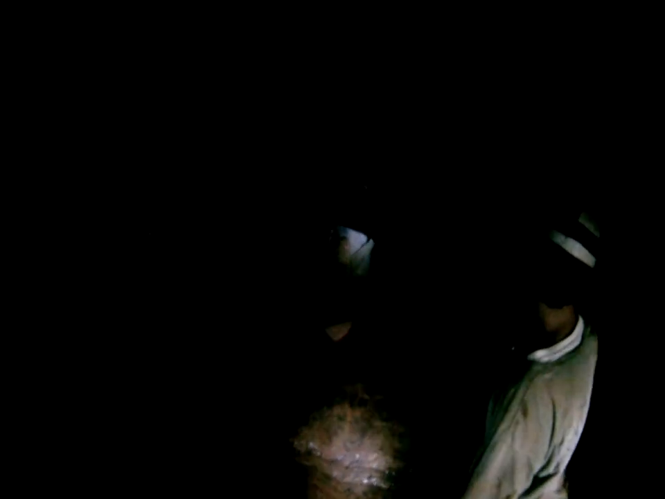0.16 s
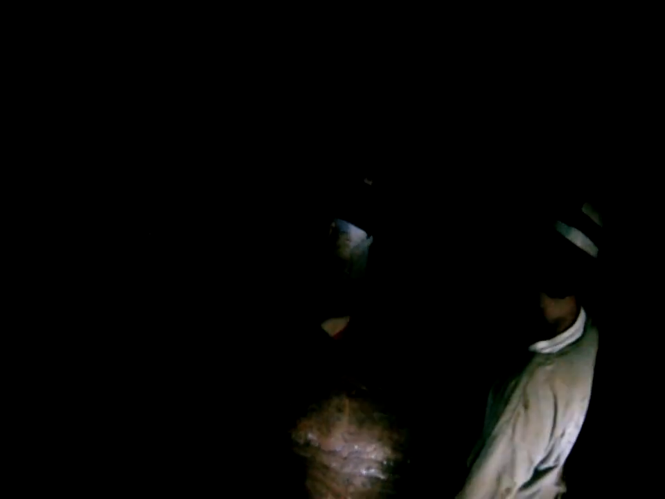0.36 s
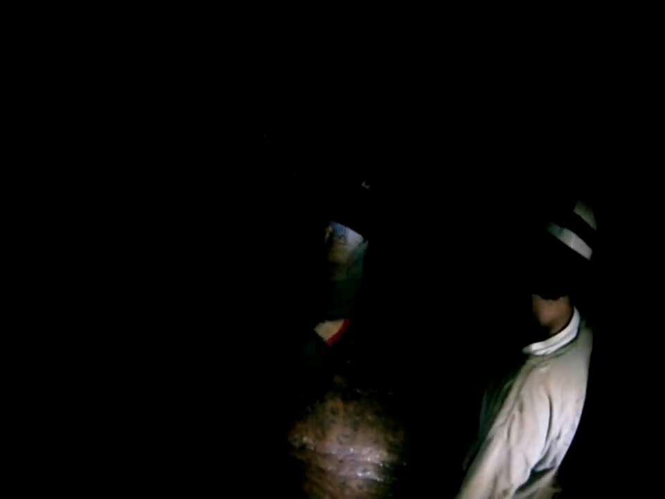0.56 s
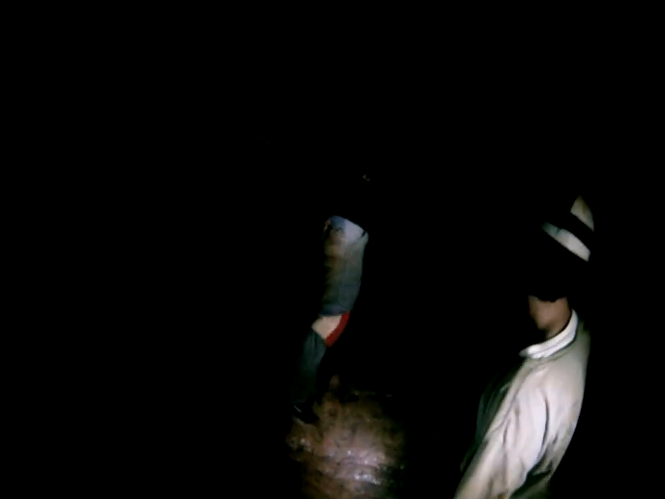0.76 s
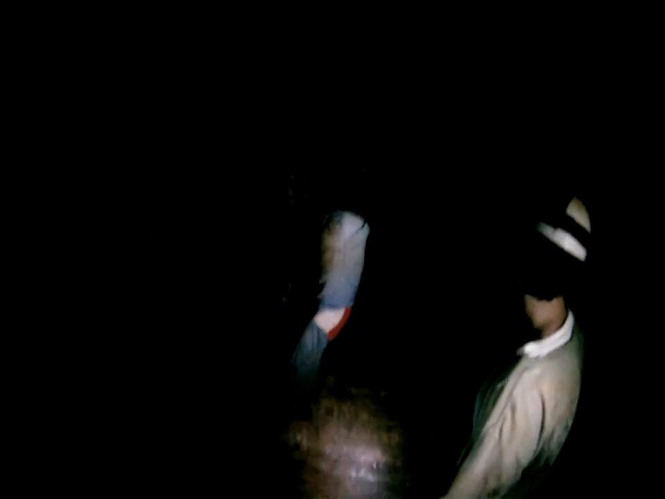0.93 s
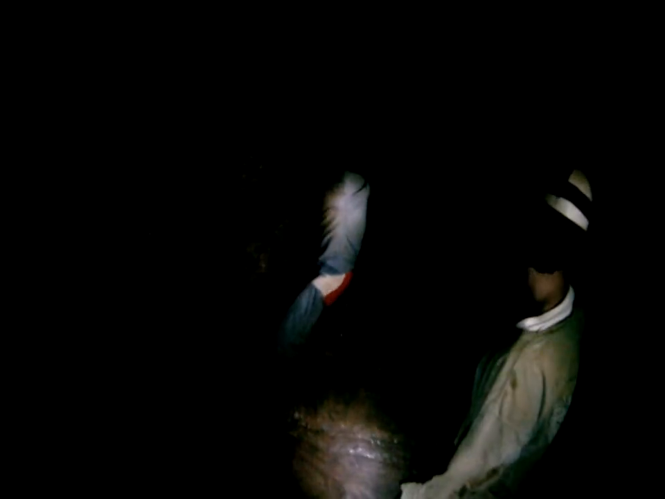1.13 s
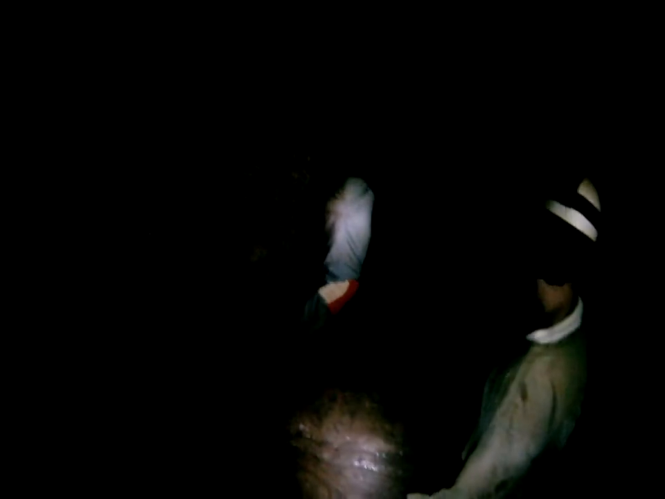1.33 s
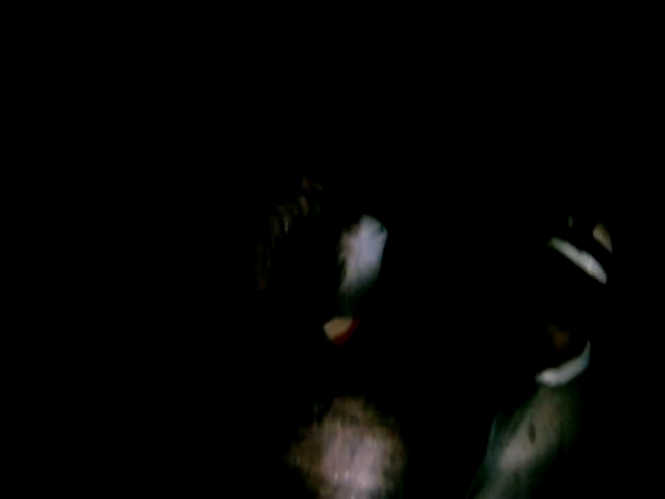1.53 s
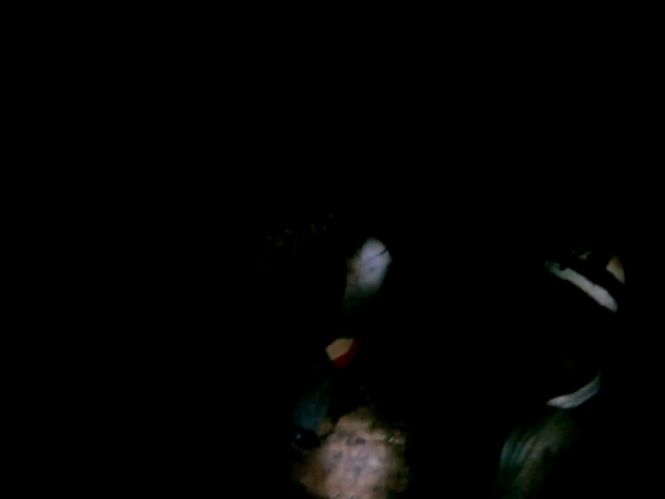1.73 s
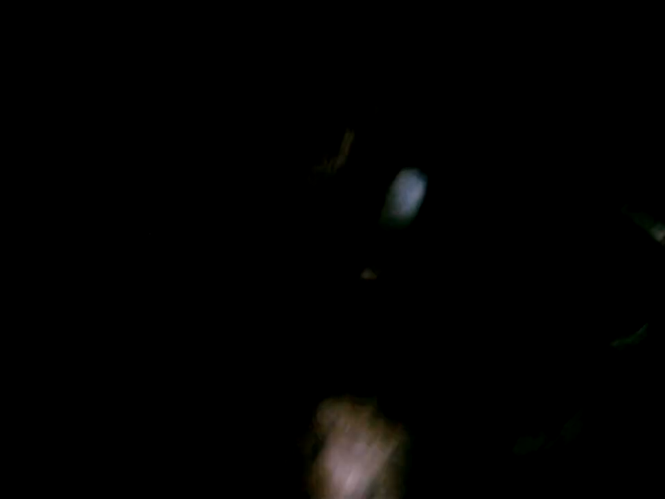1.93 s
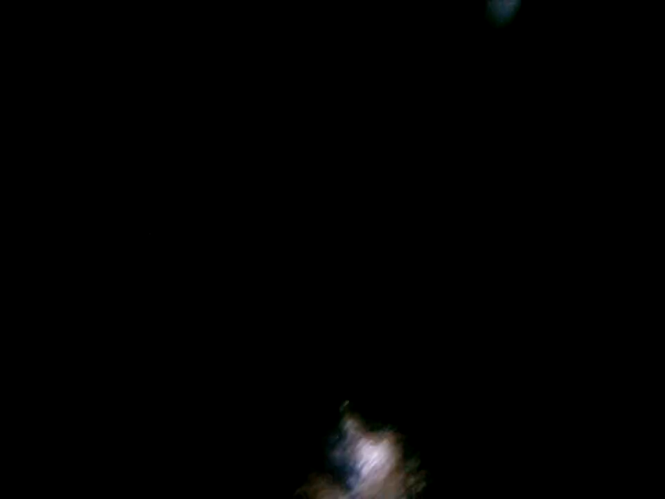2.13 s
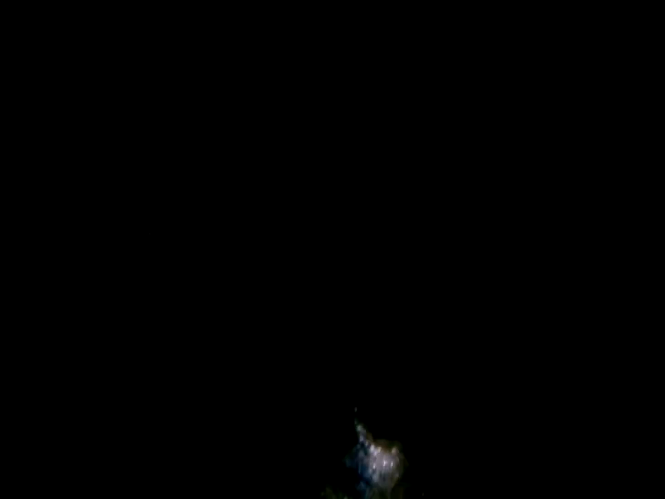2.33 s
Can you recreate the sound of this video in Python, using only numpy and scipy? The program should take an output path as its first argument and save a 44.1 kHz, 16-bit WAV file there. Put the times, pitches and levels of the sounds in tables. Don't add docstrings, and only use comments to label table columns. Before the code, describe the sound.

Steady water hiss fills a cave passage, coloured by a ringing sealed housing; a hard low double knock comes early with a brief rattle, then weaker thumps, a few tiny drops and faint late bumps.

```python
import sys
import numpy as np
from scipy import signal
from scipy.fft import rfft, irfft, next_fast_len
from scipy.io import wavfile
from scipy.ndimage import uniform_filter1d, map_coordinates

SR = 44100
rng = np.random.default_rng(int(sys.argv[2]) if len(sys.argv) > 2 else 0)


def unload_audio(sound):
    columns = np.transpose(np.atleast_2d(sound))
    steps = np.round(np.clip(columns, -1, 1) * 32767)
    wavfile.write(sys.argv[1], SR, steps.astype(np.int16))


def linear_from_db(decibels):
    return 10 ** (np.asarray(decibels, float) / 20)


N = 105840

# f/Hz, level/dB per Hz
WATER_COLOUR = [(100, -11.5), (300, -13), (700, -13.5), (1600, -15), (3000, -15.5), (4500, -24.5),
                (5500, -16), (6000, -25)]
# f/Hz, width/Hz, level/dB
SHELL_RESONANCES = [(1164, 137, -2), (1415, 61, -10), (1850, 124, -9), (2100, 233, 0.5), (2470, 205, -5),
                    (2684, 80, -1.5), (2890, 150, -5), (3174, 130, -7.5), (3603, 343, -4.5), (3794, 75, -7),
                    (4450, 200, -16), (4987, 288, -6)]
# t/s, peak level/dB
DROPS = [
    (1.1818, -27),
    (1.2972, -29),
    (2.273, -29),
    (2.0513, -33),
    (1.692, -33),
    (1.0748, -33),
    (.9485, -33),
]
# t/s, peak level/dB, f/Hz, rise/s, softness
BUMPS = [(0.2102, -11.5, 82.5, 0.014, 2.8), (0.2413, -21, 73.2, 0.013, 4.9),
         (0.2636, -27.2, 81.6, 0.022, 5.2), (0.2923, -35, 62, 0.0079, 0.69), (0.377, -23, 55.6, 0.024, 10),
         (0.4211, -21, 53, 0.0088, 0.47), (0.62, -41, 27.7, 0.0083, 0.87),
         (0.7902, -41.5, 35.8, 0.019, 5.9), (0.9254, -37.5, 51.5, 0.027, 1.1),
         (1.1758, -44, 55, 0.025, 0.92), (1.346, -52, 55.7, 0.021, 0.81),
         (1.4974, -46.9, 55.6, 0.0182, 0.53), (1.5969, -34, 60, 0.0093, 2.4),
         (2.0342, -41, 43.8, 0.027, 8.6), (2.0812, -30, 33.5, 0.026, 5.7),
         (2.1341, -36.9, 49.3, 0.042, 2.5), (2.23, -38, 51.1, 0.016, 1.6),
         (2.2945, -39.5, 34.3, 0.0151, 1.6), (2.36, -36, 37.6, 0.0122, 4.4)]
# t/s, peak level/dB, f/Hz, rise/s,
# softness
RINGS = [(.213, -30.5, 161.6, 0.016, 2), (.24, -37, 163, .012, 2.5), (.218, -42.5, 287, 0.019, 1.3),
         (.212, -41.5, 223, 0.0086, 2.8), (.39, -48, 240, .012, 1.9), (.228, -42.5, 1147, .014, 0.62),
         (.25, -58, 1160, 0.006, 2.9), (.386, -43, 1087, 0.0042, 1.5), (.39, -41, 149, 0.018, 2.5),
         (.415, -41.5, 166.6, 0.017, 1.4), (.505, -42, 57.2, 0.026, 1.2), (.57, -42.5, 58, .02, 1.8),
         (.635, -48, 101, 0.017, 1.9), (1.79, -44.5, 55.3, .015, 1.5), (2.003, -44, 55, 0.018, 2.6),
         (2.03, -55.5, 127, 0.027, 0.89)]
# t/s, level/dB, swell/s
RATTLES = [
    (.212, -42.5, 0.013),
    (.242, -43, 0.011),
    (0.385, -46, 0.0062),
    (.425, -56, 0.013),
]
# f/Hz, width/Hz, level/dB
LOOSE_PARTS = [(240, 120, -2.5), (1030, 55, 1), (1470, 68, -11), (2600, 900, -7.5)]
# f/Hz, level/dB per Hz
RUMBLE_COLOUR = [(10, -6), (25, -11.5), (40, -3), (56, -1.5), (75, -10.5), (110, -22), (200, -38),
                 (400, -59)]

WATER_DB, PATCHY_DB, SURGE_DB, FLUTTER_DB = -40, 0.46, 0.43, 0.21
SPRAY_PER_S, SPRAY_DB, SPRAY_SPREAD_DB = 400, -17, 2
DROP_HZ, DROP_WIDTH_HZ = 2500, 1050
RUMBLE_DB, LUMPS_DB = -54.5, 0.5
RECORDER_HZ, HOLD = 12000, 4


def unit(x):
    return x / np.sqrt(np.mean(x ** 2) + 1e-20)


def along(points, hz):
    f, db = np.transpose(points)
    return linear_from_db(np.interp(np.log(hz + 1), np.log(f + 1), db))


def humps(peaks, hz):
    return sum(linear_from_db(2 * db) / (1 + (2 * (hz - centre) / width) ** 2) for centre, width, db in peaks)


def wobble(rate):
    knots = rng.standard_normal(int(N * rate / SR) + 4)
    return map_coordinates(knots, [np.arange(N) * rate / SR])


def coloured(x, gain):
    m = 2 * next_fast_len(N // 2 + SR // 4)
    cepstrum = irfft(np.log(gain(np.fft.rfftfreq(m, 1 / SR)) + 1e-6), m)
    cepstrum[1:m // 2] *= 2
    cepstrum[m // 2 + 1:] = 0
    return irfft(rfft(x, m) * np.exp(rfft(cepstrum)), m)[:N]


def swell(u, softness):
    return (u * np.exp(1 - u)) ** softness


def water():
    flow = unit(coloured(rush() + linear_from_db(SPRAY_DB) * spray(), shell))
    level_db = WATER_DB + SURGE_DB * wobble(1.68) + FLUTTER_DB * wobble(25.2)
    return flow * linear_from_db(level_db) + drops()


def rush():
    z = signal.stft(rng.standard_normal(N), nperseg=512)[2]
    patches = uniform_filter1d(rng.standard_normal(z.shape), size=6, axis=0)
    patches = uniform_filter1d(patches, size=10, axis=1)
    return unit(signal.istft(z * linear_from_db(PATCHY_DB * unit(patches)), nperseg=512)[1][:N])


def spray():
    when, how_big, sign = rng.random((int(SPRAY_PER_S * N / SR), 3)).T
    size = linear_from_db(-SPRAY_SPREAD_DB * np.log(1 - how_big)) * np.sign(sign - .5)
    return unit(np.bincount((when * N).astype(int), size, N))


def drops():
    one_peak = np.abs(coloured(np.arange(N) == 0, pop)).max()
    starts = [round(t * SR) for t, _ in DROPS]
    sizes = [-linear_from_db(db) / one_peak for _, db in DROPS]
    return coloured(np.bincount(starts, sizes, N), pop)


def pop(hz):
    return shell(hz) * humps([(DROP_HZ, DROP_WIDTH_HZ, 0)], hz)


def shell(hz):
    power = along(WATER_COLOUR, hz) ** 2 + humps(SHELL_RESONANCES, hz)
    return np.sqrt(power) * (hz < RECORDER_HZ / 2)


def bumps(rows):
    t = np.arange(N) / SR
    total = np.zeros(N)
    for start, db, hz, rise, softness in rows:
        since = np.clip(t - start, 0, None)
        total -= linear_from_db(db) * swell(since / rise, softness) * np.sin(2 * np.pi * hz * since)
    return total


def rattle():
    t = np.arange(N) / SR
    shake = sum(linear_from_db(db) * swell(np.clip(t - start, 0, None) / rise, 1.2) for start, db, rise in RATTLES)
    buzz = coloured(rng.standard_normal(N), lambda hz: np.sqrt(humps(LOOSE_PARTS, hz)))
    return shake * unit(buzz)


def rumble():
    low = coloured(rng.standard_normal(N), lambda hz: along(RUMBLE_COLOUR, hz))
    return linear_from_db(RUMBLE_DB) * unit(low * linear_from_db(LUMPS_DB * wobble(8.75)))


def scene():
    return (water() + bumps(BUMPS) + bumps(RINGS) + rattle() + rumble())[None]


def top_cut(x):
    return signal.sosfilt(signal.butter(12, 15310, fs=SR, output="sos"), x)


def record(dry):
    slow = signal.resample(dry, N * RECORDER_HZ // SR, axis=1)
    held = signal.resample(np.repeat(slow, HOLD, axis=1), N, axis=1)
    return top_cut(held)


dry = scene()
out = record(dry)
unload_audio(out)
```